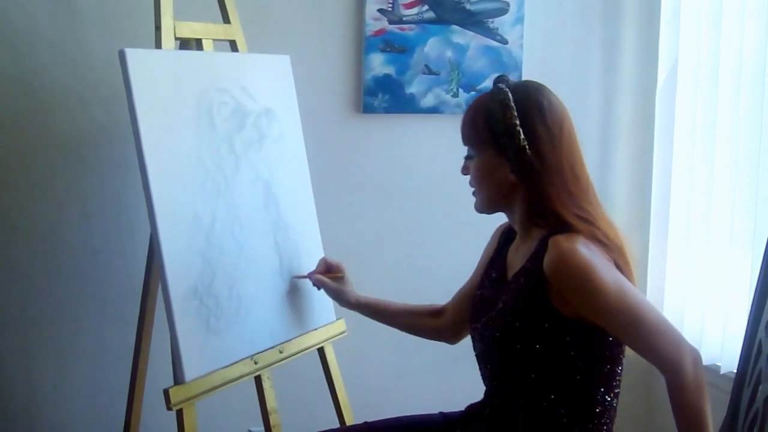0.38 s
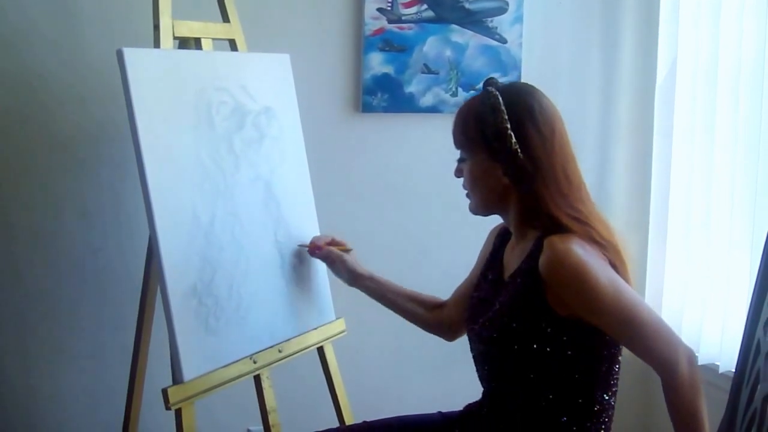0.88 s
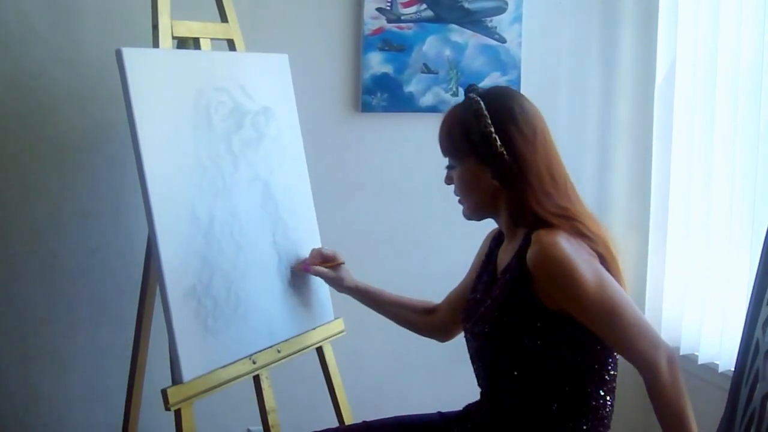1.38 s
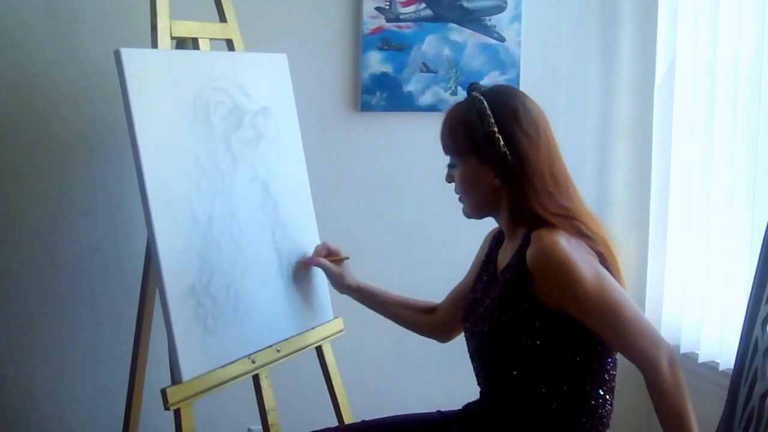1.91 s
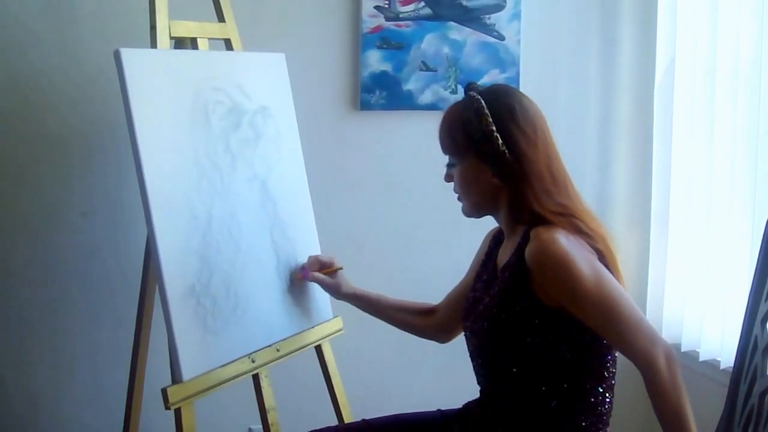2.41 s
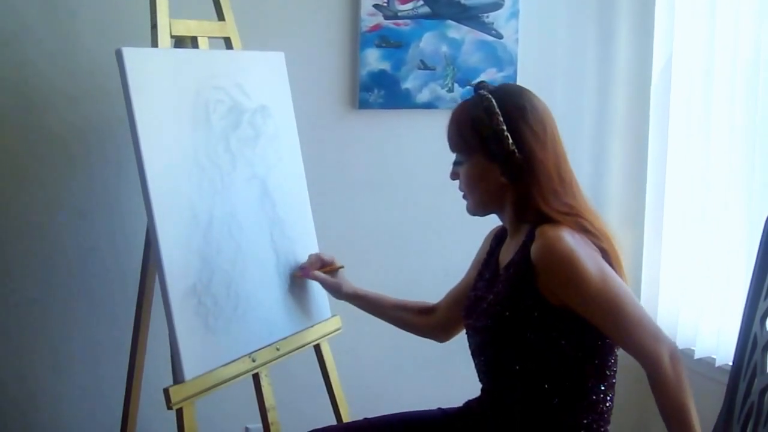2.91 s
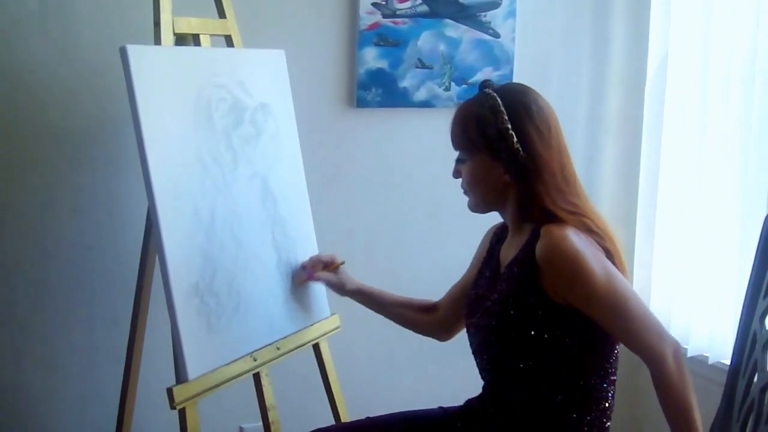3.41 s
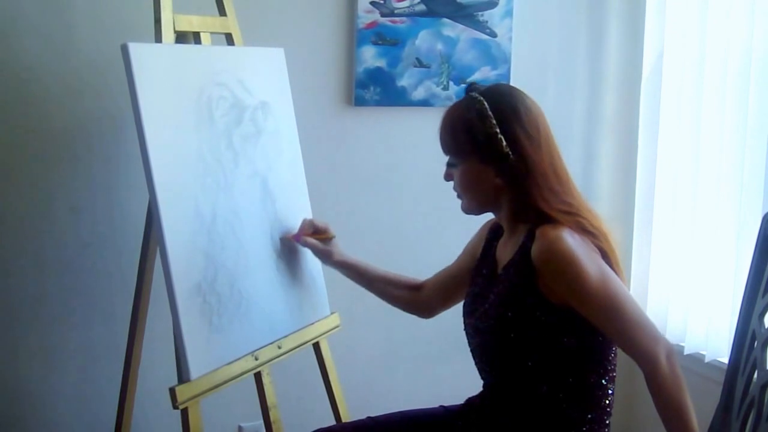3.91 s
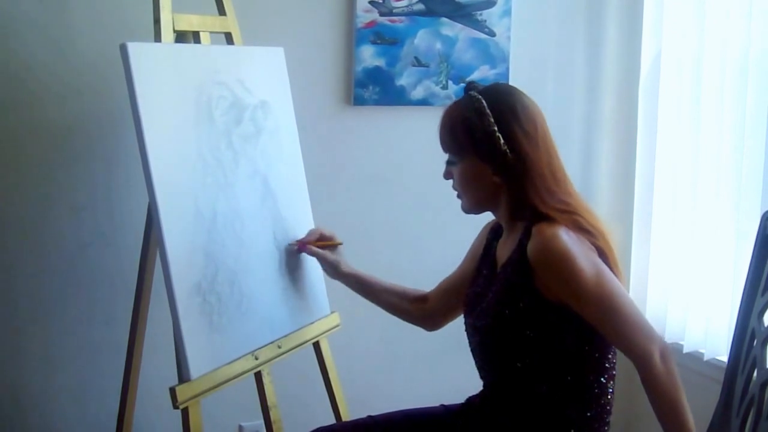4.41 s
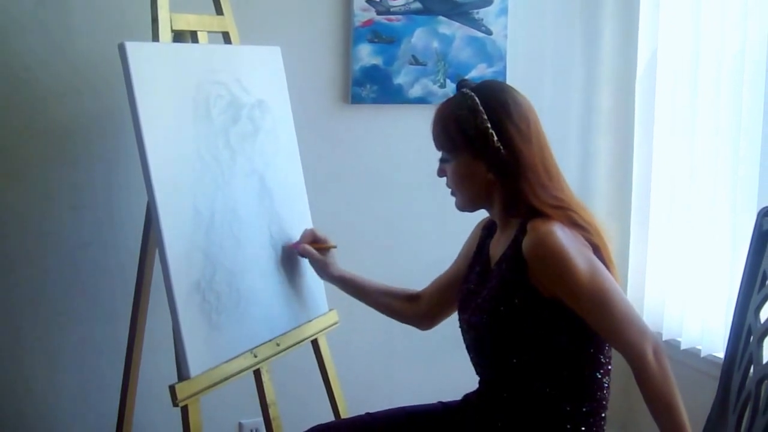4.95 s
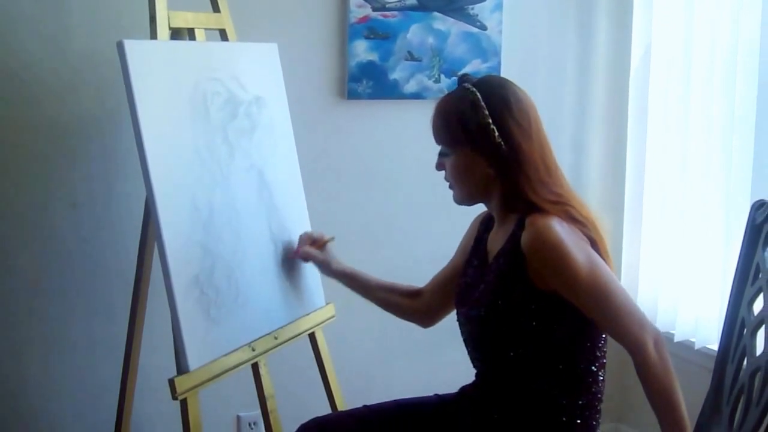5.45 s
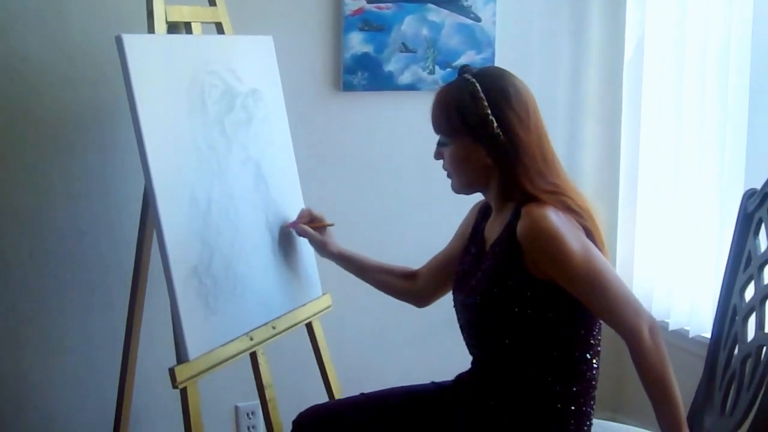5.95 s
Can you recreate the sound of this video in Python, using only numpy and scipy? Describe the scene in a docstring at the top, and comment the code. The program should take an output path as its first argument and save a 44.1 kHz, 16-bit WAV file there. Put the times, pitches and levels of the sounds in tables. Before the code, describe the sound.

A pencil scratches short, uneven strokes on a stretched canvas in a quiet room, with small taps and a faint hollow drumhead resonance.

```python
"""A pencil hatches short strokes on a stretched canvas in a quiet, bare room.
Friction is dense random slips, banded into push, rasp, buzz, hiss and singing that swell with each movement.
Ticks of the tip are single banded pushes, each followed by a brief skid.
Both drive canvas resonances, a wandering canvas ring and a short room tail; mid and side make wide stereo.
Steady coloured noise is the room tone."""
import sys
import numpy as np
from scipy import signal
from scipy.fft import rfft, irfft, next_fast_len
from scipy.io import wavfile

SR = 44100
rng = np.random.default_rng(int(sys.argv[2]) if len(sys.argv) > 2 else 0)


def dump_mix(stems):
    """Bounce the given channels to the path in sys.argv[1] as a 16-bit WAV at rate SR."""
    frames = np.atleast_2d(stems).T  # one column per channel
    limited = np.clip(frames, -1, 1)  # hard clip at full scale
    pcm = np.round(limited * 32767).astype(np.int16)
    wavfile.write(sys.argv[1], SR, pcm)


def gain_from_db(level_db):
    """Convert decibel levels to linear amplitude factors (20 dB per decade)."""
    decades = np.asarray(level_db, float) / 20
    return 10 ** decades


N = 267687
SIZE = next_fast_len(N + SR)
HZ = np.maximum(np.arange(SIZE // 2 + 1) * SR / SIZE, 1)

# strokes: fastest t/s, speed-up/s, slow-down/s (each about 20 dB), force/dB, drumhead weight/dB, graphite hiss/dB
STROKES = [(0.0, .05, 0.092, -22, -3, -3), (.26, 0.062, 0.6, -29, 0, 3),
           (.474, 0.058, 0.086, -28.5, 3, -1.5), (0.555, 0.021, 0.11, -22, 4.5, -2),
           (0.668, 0.015, 0.067, -19.5, -8.5, -1.5), (1.068, 0.061, 0.19, -42.5, 5.5, 10),
           (1.36, 0.054, 0.075, -24, 4.5, -4), (1.473, 0.046, 0.11, -22.5, -2, -1),
           (1.725, 0.074, 0.12, -24, 2.5, -0.5), (2.03, 0.11, 0.24, -32, 2.5, 4),
           (2.125, .1, 0.098, -31, -1, 4.5), (2.418, 0.19, 0.18, -27, 3.5, 2),
           (2.735, .045, .45, -26, 2, 1), (3.054, 0.06, 0.13, -24.5, 4, 0.5),
           (3.33, 0.074, 0.17, -31, 4.5, 3), (3.421, 0.064, .1, -28.5, 1, 5),
           (3.905, 0.078, .3, -16, 0, -4), (4.144, 0.04, 0.069, -18.5, 2, -5.5),
           (4.714, 0.16, 0.11, -21.5, 6, 1), (5.111, 0.15, 0.11, -18.5, 4.5, -2),
           (5.37, 0.065, 0.33, -27.5, 4.5, 4), (5.785, .15, 0.18, -23, 4, 2),
           (6.07, 0.067, 0.11, -33.5, 2, 5.5)]
# tip digs into a ridge mid-stroke: t/s, fade/s (about 20 dB), force/dB, weight/dB, hiss/dB
CATCHES = [(.35, .06, -27.5, 7, -4), (.417, .07, -22, 0, -4), (1.21, .04, -35, -8, 0),
           (1.257, .04, -25, -6, 4), (1.685, .05, -25.5, -1, -1), (2.77, .07, -27, 11, -3),
           (2.93, .07, -32, -11, 4), (4.06, .05, -22, 6, -4), (4.712, .05, -23, -11, -6),
           (4.8, .05, -27, -3, 6.5), (5.184, .07, -20, -6, 0.5), (5.46, .04, -26, 0, -0.5),
           (5.58, .08, -34, 4, -24), (5.892, .05, -25, -7.5, 3)]
# threads sing in a narrow band as a stroke gathers speed: t/s, rise/s, fade/s, level/dB
SINGING = [(.365, .05, .07, -28), (.49, .05, .05, -30), (3.94, .1, .15, -22), (4.615, .06, .1, -30),
           (5.0, .06, .08, -33), (5.37, .07, .12, -27), (5.73, .06, .09, -25)]
# tip lands or snags, levels before make-up: t/s, peak/dB, body re peak/dB, brightness re peak/dB, skid force/dB
TICKS = [(0.1795, -26, -12, -30, -34), (0.3351, -21.5, -8.5, 6, -28), (1.0295, -31.5, -12, -19, -35.5),
         (1.132, -31.5, -12, -19, -35), (1.2296, -19.5, -16, -11, -20.5), (1.272, -16, -7, -28, -19),
         (1.4154, -26.5, -1.5, 4, -24.5), (1.6335, -26.5, -12, -19, -27.5), (1.7914, -32.5, 7.5, 0, -18),
         (1.9733, -30, -18, -14, -36), (2.0737, -26, -8, -12, -31), (2.1033, -26, -10, -8, -27),
         (2.14, -29, -7, -16, -30.5), (2.2836, -31, -17, -17, -31), (2.6388, -31, -18, -20, -34),
         (3.1463, -22, -10, 5.5, -27.5), (3.271, -29.5, -12, -8, -35), (3.8111, -24.5, -16, -11, -24),
         (3.8443, -21, -2.5, -3, -31), (3.8935, -16, -18, 4, -30), (3.982, -16.5, -21, 2, -32),
         (4.0854, -15, -31, 5, -35), (4.0921, -12, -20, 4.5, -16), (4.098, -17, -19, -18, -40),
         (4.4472, -36, -14, 14.5, -60), (4.5469, -28, -8, -23, -40), (4.7575, -20.5, -5.5, -14, -21.5),
         (4.9535, -22.5, -13, -23, -28), (5.3086, -24, -9.5, -14, -34), (5.4733, -21.5, 1, -19, -24),
         (5.6501, -23, -12.5, -17, -26), (6.0116, -25, -10, -21, -31.5)]
# gain restoring what bands and canvas take from a push: body/dB, middle/dB, treble/dB
TICK_MAKEUP_DB = [26.5, 25, 21]
# scrape layers, rows push, rasp, buzz, hiss: gain/dB, share of swell followed/1, stroke lag/s (negative leads)
LAYERS = [(0.5, 1.286, 0.000041), (-1, 1.253, -0.0049), (-0.9, 0.95, -0.0087), (2.5, 0.85, -0.0048)]
# canvas and frame resonances: f/Hz, width/Hz, lift over broad colour/dB
CANVAS_MODES = [(163.3, 17, 6.5), (286, 19, 6.5), (368.7, 25, 6), (435.6, 83.5, 10), (579, 126, 6.5),
                (668, 102, 5.5), (810, 86, 5.5), (933, 5.3, 0.5), (1071, 44, 1), (1137, 35, 5.5),
                (1360, 120, 4.5), (1346, 8.9, 1.5), (1683, 39, 4.5), (1800, 19, 7.5), (2156, 69, 2.5),
                (2860, 360, 1.5)]
# broad colour of bare canvas: f/Hz, level/dB
CANVAS_COLOUR = [(40, -67), (90, -26.5), (150, -18), (295, 0), (490, -4), (800, -1.5), (1200, 2),
                 (2200, -5.5), (3600, -12.5), (6000, -17), (8800, -20), (9500, -16.5), (11000, -17),
                 (14000, -24)]
# ringing time: f/Hz, canvas t60/s, room t60/s
RING = [(152, 0.028, 0.44), (480, 0.37, 0.63), (1480, 0.056, 0.46), (3960, 0.023, 0.45),
        (9800, 0.0041, 0.11)]
# unrelated side re mid, before the 3 dB lift in scene(): f/Hz, level/dB
SPREAD = [(130, -7), (300, -8.5), (600, -8), (1200, -12), (2600, -8), (5400, -3.5), (11000, -3)]
# stereo lean: f/Hz, left over right/dB
LEAN = [(60, 1.0), (170, 1.2), (490, 2.4), (1410, 5.5), (4030, 0.91), (11500, 1.4)]
# room tone colour, mid and side, before scaling to rms: f/Hz, level/dB
TONE_MID = [(18, -65), (30, -35), (111, -20), (161, -12), (432, -8), (477, -6.5), (691, -9), (2970, -19),
            (11000, -19.5), (14300, -10.5), (22000, -120)]
TONE_SIDE = [(18, -87), (30, -77), (108, -16), (401, -5), (514, -10), (554, -6), (611, -9.5), (822, -9),
             (3800, -27), (11000, -31.5), (14300, -63), (22000, -120)]

TONE_MID_RMS_DB, TONE_SIDE_RMS_DB = -49, -40
CANVAS_TAIL_DB, TICK_TAIL_DB, ROOM_DB = -4, 0, -2.5
TIP_MOVES_PER_S = 12.3
SLIPS_PER_S, SLIP_SPREAD_DB = 5000, 4.5
FLUTTER_DB, HISS_FLUTTER_DB = 2, 1.4
RISE_ROUNDNESS, FALL_ROUNDNESS = 1.47, 1.186  # exponent: 1 pointed, 2 bell
CATCH_RISE_SHARE = 0.55  # of the fade
SKID_RISE_S, SKID_FALL_S = 0.0012, 0.056
SKID_WEIGHT_DB, SKID_HISS_DB, SKID_BUZZ_DB = 0.5, -3, 2.5
BUZZ_WITH_HISS, BUZZ_WITH_FORCE, USUAL_FORCE_DB = 0.24, 0.11, -23  # slopes in dB per dB
SING_LOW_HZ, SING_HIGH_HZ = 1900, 3100
CUTOFF_HZ = 10990


def rms_one(x):
    """Scale to rms 1."""
    return x / np.sqrt(np.mean(x ** 2) + 1e-20)


def at_hz(points, hz, axis=1):
    """Read a table column on a log-frequency axis."""
    points = np.array(points)
    return np.interp(np.log(hz), np.log(points[:, 0]), points[:, axis])


def causal(db):
    """Minimum-phase response for a dB curve: nothing sounds before its cause."""
    cepstrum = irfft(np.log(gain_from_db(db)), SIZE)
    cepstrum[1:SIZE // 2] *= 2
    cepstrum[SIZE // 2 + 1:] = 0
    return np.exp(rfft(cepstrum))


def through(x, response):
    """Filter by a frequency response."""
    return irfft(rfft(x, SIZE) * response, SIZE)[:N]


def band(x, low_hz, high_hz):
    """Butterworth band-pass."""
    sos = signal.butter(2, [low_hz, high_hz], "band", fs=SR, output="sos")
    return signal.sosfilt(sos, x)


def drift(rate_hz):
    """Slow chance, rms 1: noise through two equal one-pole low-passes."""
    r = np.exp(-2 * np.pi * rate_hz / SR)
    noise = rng.standard_normal(N + SR)
    return rms_one(signal.lfilter([1], [1, -2 * r, r * r], noise)[SR:])


def swells(t, rows, share):
    """Power of each movement: swell to its fastest moment, then fade."""
    s, rise_s, fall_s, force_db = np.array(rows).T[:4, :, None]
    away = np.where(t < s, (s - t) / rise_s, (t - s) / fall_s)
    roundness = np.where(t < s, RISE_ROUNDNESS, FALL_ROUNDNESS)
    return gain_from_db(2 * (force_db - 20 * share * away ** roundness))


def effort():
    """Gains of push, rasp, buzz, hiss, singing: movements add in power; only strokes let layers lag."""
    t = np.arange(0, N / SR + .001, .0005)
    catches = [(s, CATCH_RISE_SHARE * fall_s, fall_s, *rest) for s, fall_s, *rest in CATCHES]
    skids = [(row[0] + SKID_RISE_S, SKID_RISE_S, SKID_FALL_S, row[-1], SKID_WEIGHT_DB, SKID_HISS_DB)
             for row in TICKS]
    brief = catches + skids
    force_db, weight_db, hiss_db = np.array(list(STROKES) + brief).T[-3:]
    # harder or hissier movements buzz more
    buzz_db = BUZZ_WITH_HISS * hiss_db + BUZZ_WITH_FORCE * (force_db - USUAL_FORCE_DB)
    buzz_db[-len(skids):] += SKID_BUZZ_DB
    gains = []
    for (gain_db, share, lag_s), own_db in zip(LAYERS, [weight_db, 0 * hiss_db, buzz_db, hiss_db]):
        movements = np.vstack([swells(t - lag_s, STROKES, share), swells(t, brief, share)])
        power = gain_from_db(2 * own_db) @ movements
        gains.append(gain_from_db(gain_db) * np.interp(np.arange(N) / SR, t, np.sqrt(power)))
    sing_power = swells(t, SINGING, 1).sum(axis=0)
    gains.append(np.interp(np.arange(N) / SR, t, np.sqrt(sing_power)))
    return gains


def friction():
    """Tip catches on the weave in uneven random slips; fine hiss adds plain noise."""
    push, rasp, buzz, hiss, sing = effort()
    sizes = gain_from_db(SLIP_SPREAD_DB * np.minimum(rng.exponential(1, N), 4)) * rng.choice([-1, 1], N)
    slips = rms_one(sizes * (rng.random(N) < SLIPS_PER_S / SR))
    rub = push * band(slips, 59, 337)
    rub += rasp * band(slips, 420, 1420)
    rub += buzz * band(slips, 1825, 3450)
    rub += sing * band(band(slips, SING_LOW_HZ, SING_HIGH_HZ), SING_LOW_HZ, SING_HIGH_HZ)
    fine = hiss * band(0.25 * slips + rng.standard_normal(N), 3410, 22000)
    tremble = drift(45)  # hand pressure over the threads
    return gain_from_db(FLUTTER_DB * tremble) * rub + gain_from_db(HISS_FLUTTER_DB * tremble) * fine


def canvas():
    """Stretched canvas response: broad colour with resonances standing out."""
    db = at_hz(CANVAS_COLOUR, HZ)
    for hz, width_hz, lift_db in CANVAS_MODES:
        db = db + lift_db / (1 + (2 * (HZ - hz) / width_hz) ** 2)
    return causal(db)


def tail(axis, onset_s, count=1):
    """Dense ringing responses: noise dying away band by band, energy 1 at every pitch."""
    t, out = np.arange(SR // 2) / SR, 0
    edges_hz = 50 * 2 ** np.arange(0, 8.6, .5)
    for low, high in zip(edges_hz, edges_hz[1:]):
        t60_s = at_hz(RING, np.sqrt(low * high), axis)
        fade = gain_from_db(-60 * t / t60_s) * (1 - np.exp(-t / onset_s))
        dying = band(rng.standard_normal((count, len(t))), low, high) * fade
        energy = np.sum(dying ** 2, axis=1, keepdims=True)
        out = out + dying * np.sqrt(2 * (high - low) / SR / energy)
    return rfft(out, SIZE)


def moving_ring(force):
    """Tip wanders over the canvas, so the mix of ringing it drives keeps changing."""
    places = np.array([drift(TIP_MOVES_PER_S) for _ in range(8)])
    places /= np.sqrt(np.sum(places ** 2, axis=0))
    responses = tail(axis=1, onset_s=0.00068, count=8)
    return irfft(np.sum(rfft(force * places, SIZE) * responses, axis=0), SIZE)[:N]


def room_tone(spectrum, rms_db):
    """Steady coloured hiss and rumble, level wavering slightly."""
    noise = through(rng.standard_normal(N), gain_from_db(at_hz(spectrum, HZ)))
    return gain_from_db(rms_db + 0.28 * drift(21)) * rms_one(noise)


def ticks():
    """Each landing or snag is one push: weight gives the body, hardness the treble."""
    s, peak_db, body_db, bright_db = np.transpose(TICKS)[:-1]
    pushes = np.zeros((3, N))
    band_db = peak_db + np.array([body_db, 0 * s, bright_db])
    pushes[:, np.round(s * SR).astype(int)] = gain_from_db(band_db + np.c_[TICK_MAKEUP_DB])
    return band(pushes[0], 132, 1700) + band(pushes[1], 1390, 7700) + band(pushes[2], 5500, 22000)


def scene():
    """Mid carries the direct sound; side has other canvas and room reflections of the same strokes."""
    rub, tick, body = friction(), ticks(), canvas()
    ringing = gain_from_db(CANVAS_TAIL_DB) * rub + gain_from_db(TICK_TAIL_DB) * tick
    room_mid, room_side = gain_from_db(ROOM_DB) * tail(axis=2, onset_s=0.0037, count=2)
    mid = through(rub + tick + moving_ring(ringing) + through(ringing, room_mid), body)
    spread = causal(at_hz(SPREAD, HZ) + 3)
    side = through(moving_ring(ringing) + through(ringing, room_side), body * spread)
    lean = gain_from_db(at_hz(LEAN, HZ))
    side += through(mid, (lean - 1) / (lean + 1))
    mid += room_tone(TONE_MID, TONE_MID_RMS_DB)
    side += room_tone(TONE_SIDE, TONE_SIDE_RMS_DB)
    return np.array([mid + side, mid - side])


def roll_off(x):
    """The treble ends steeply here."""
    return signal.sosfilt(signal.butter(12, 12130, fs=SR, output="sos"), x)


def record(dry):
    """Steep elliptic low-pass cuts the top."""
    sos = signal.ellip(14, .5, 60, CUTOFF_HZ, fs=SR, output="sos")
    mix = signal.sosfilt(sos, dry)
    return roll_off(mix)


dry = scene()
out = record(dry)
dump_mix(out)
```